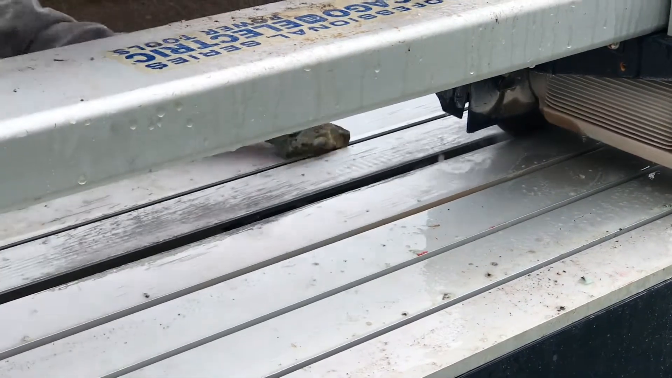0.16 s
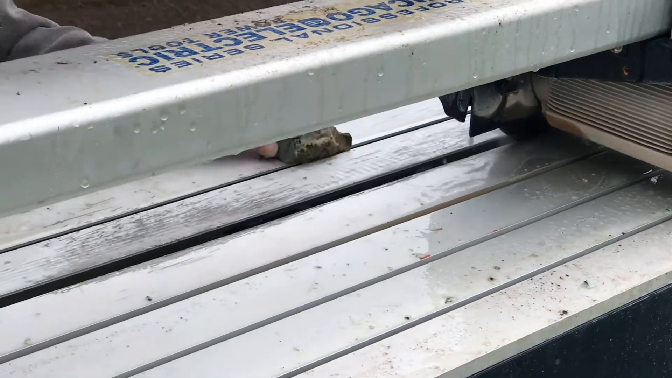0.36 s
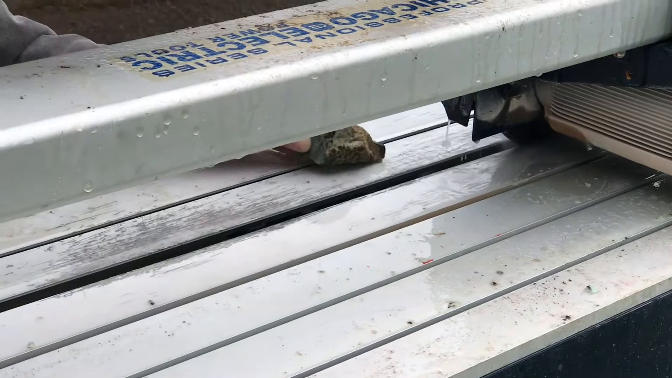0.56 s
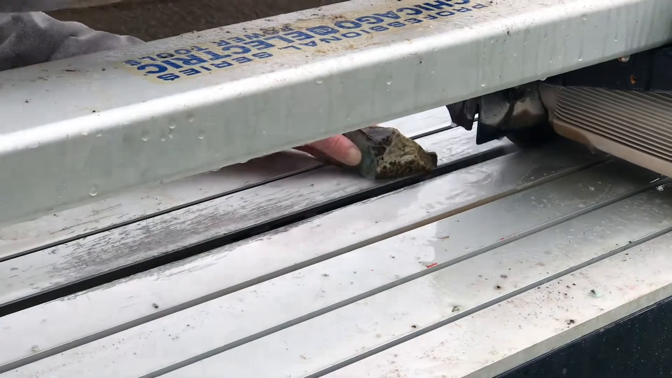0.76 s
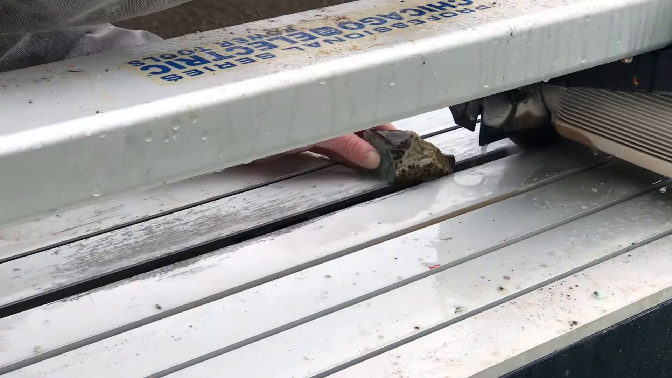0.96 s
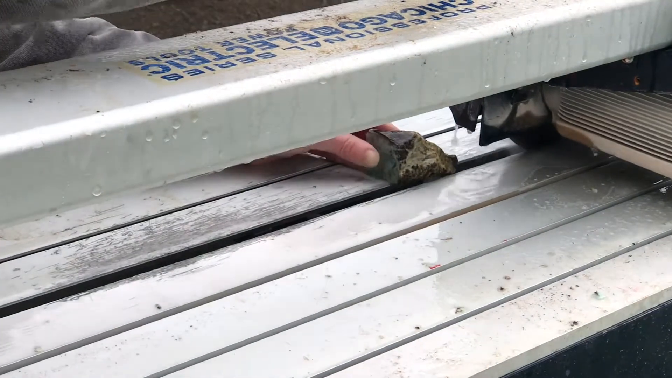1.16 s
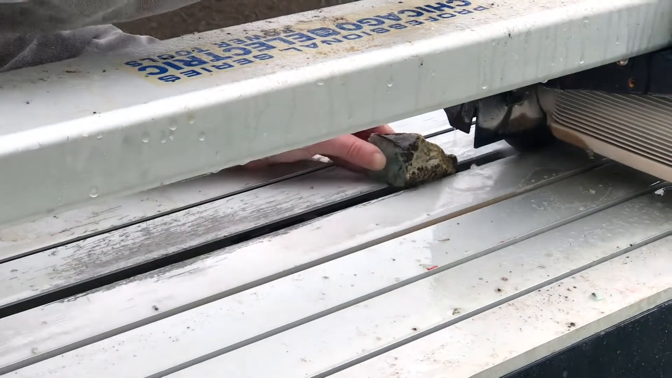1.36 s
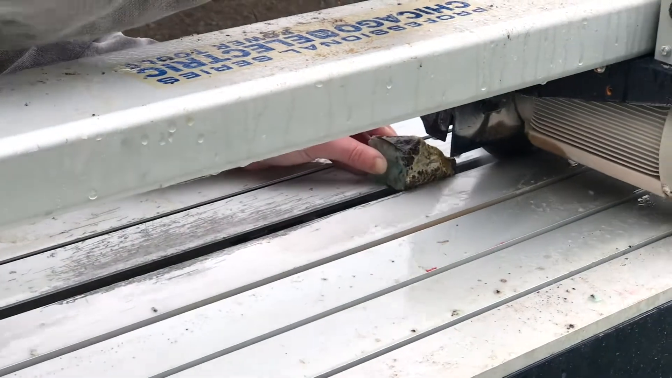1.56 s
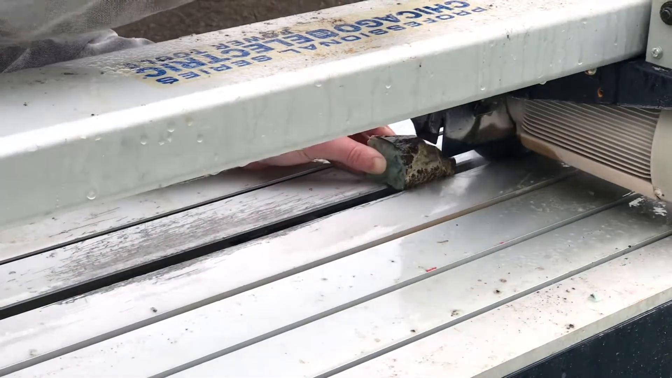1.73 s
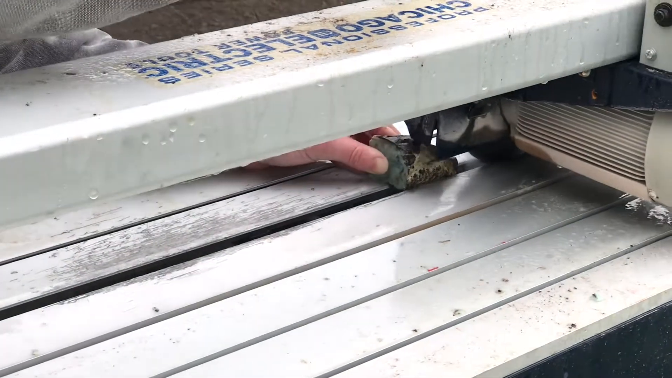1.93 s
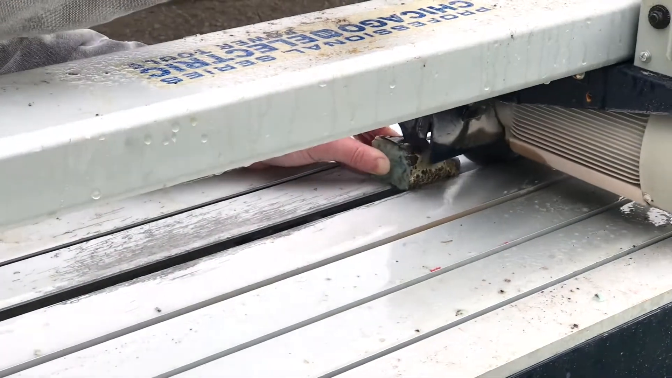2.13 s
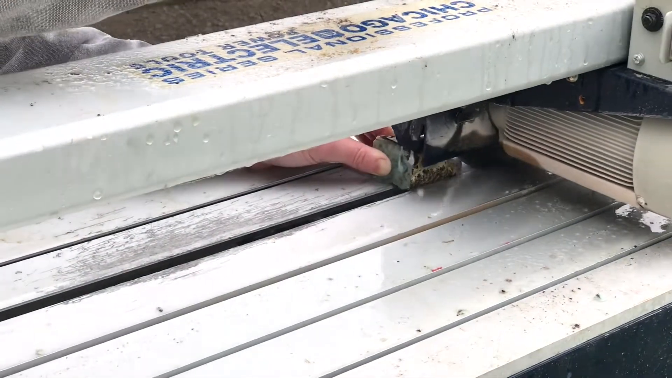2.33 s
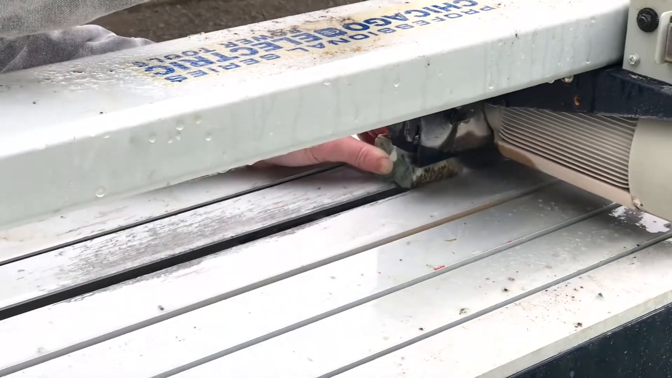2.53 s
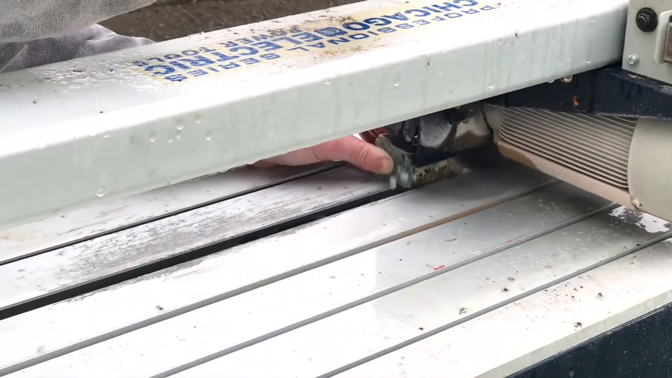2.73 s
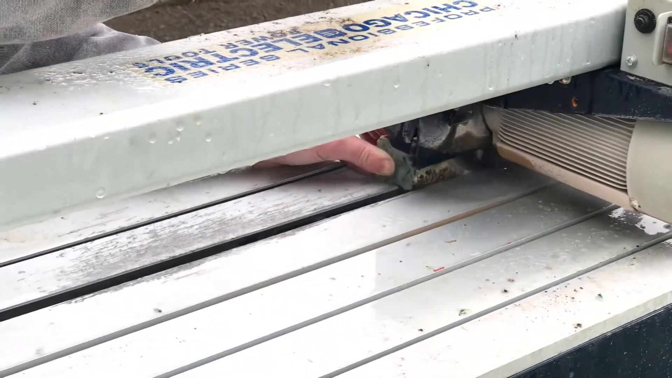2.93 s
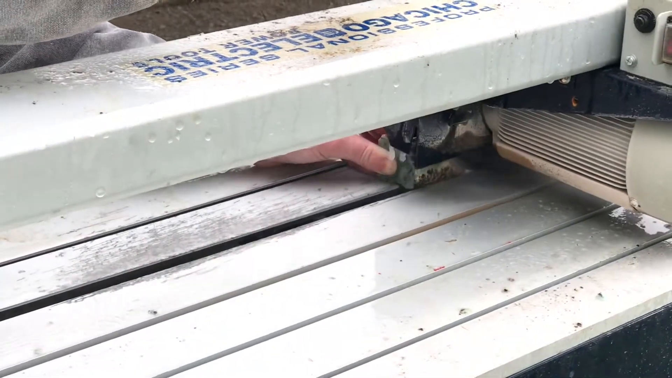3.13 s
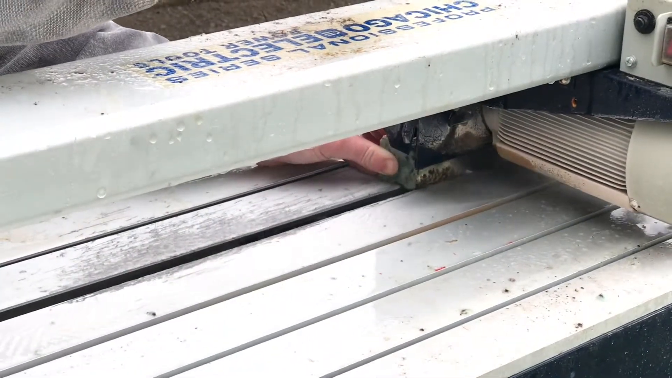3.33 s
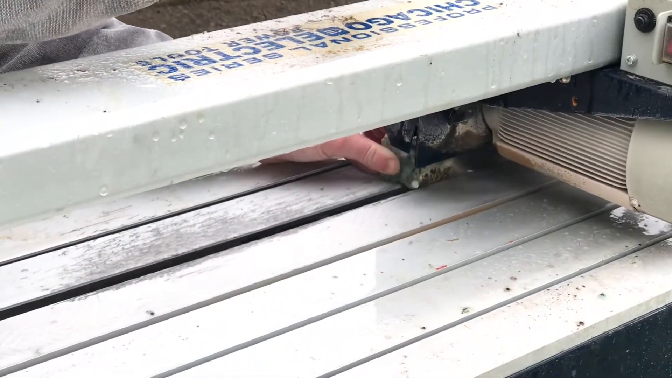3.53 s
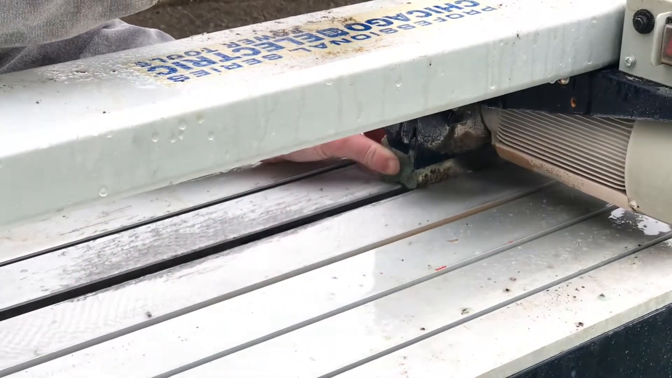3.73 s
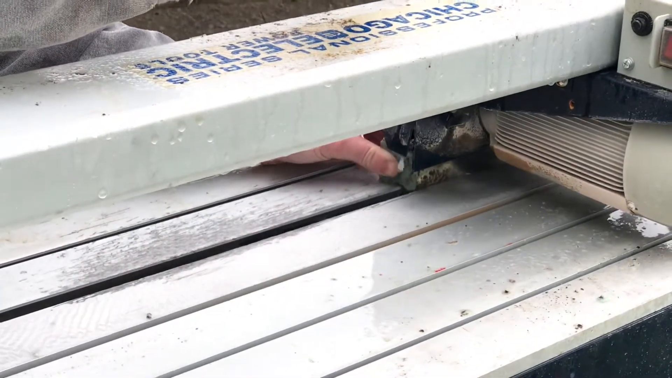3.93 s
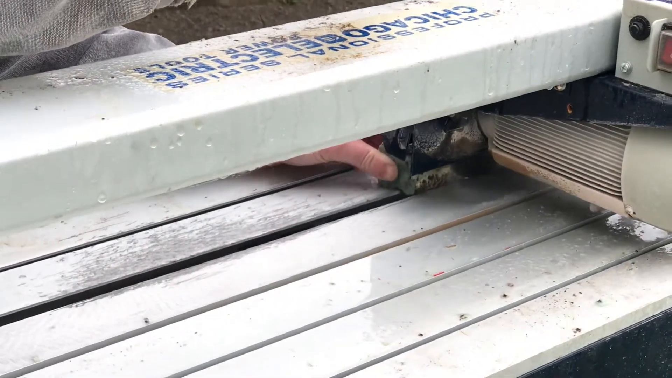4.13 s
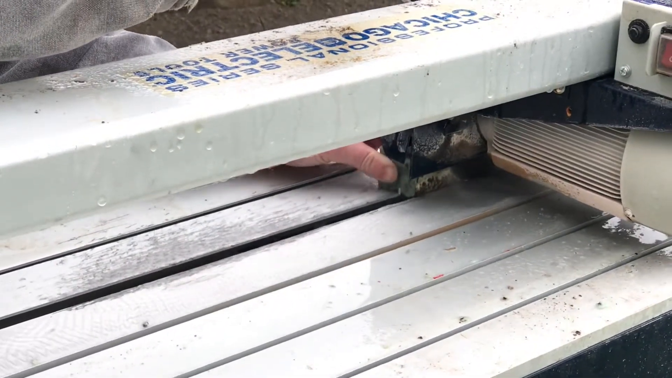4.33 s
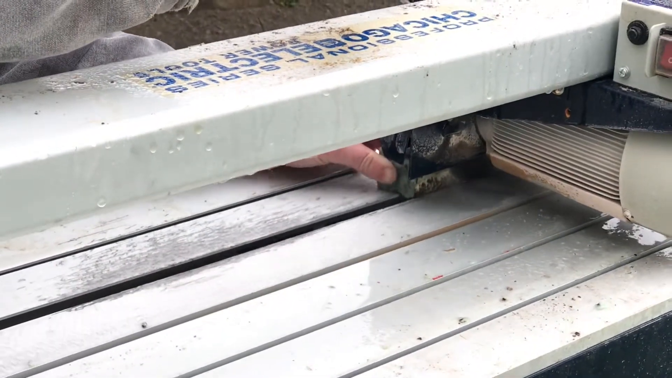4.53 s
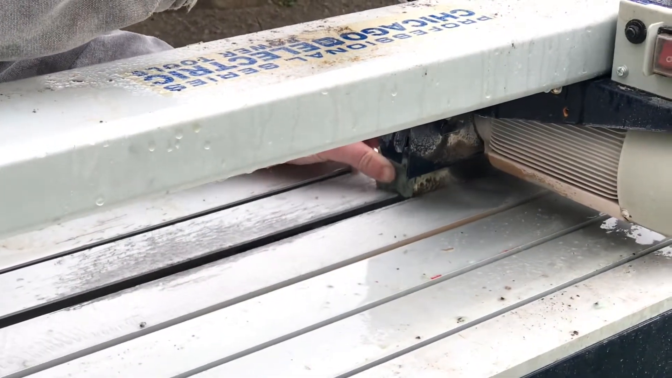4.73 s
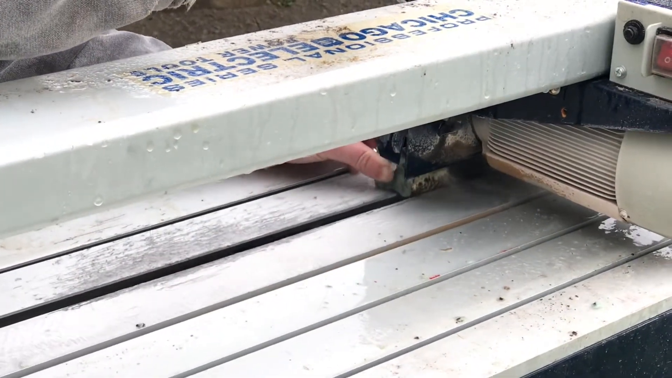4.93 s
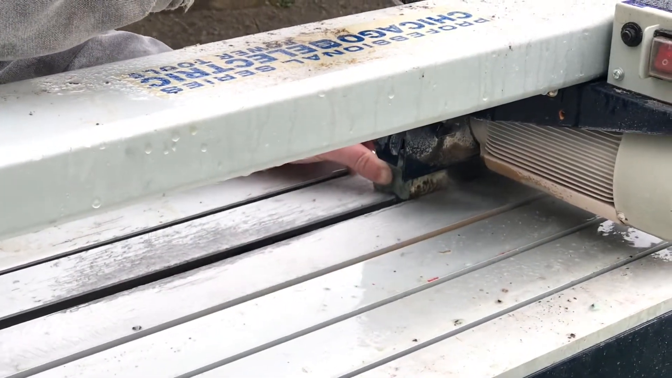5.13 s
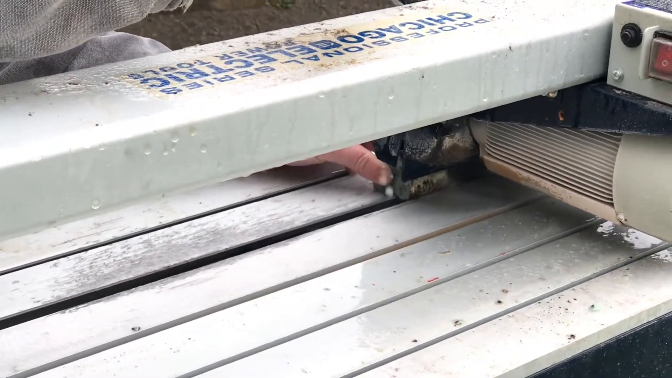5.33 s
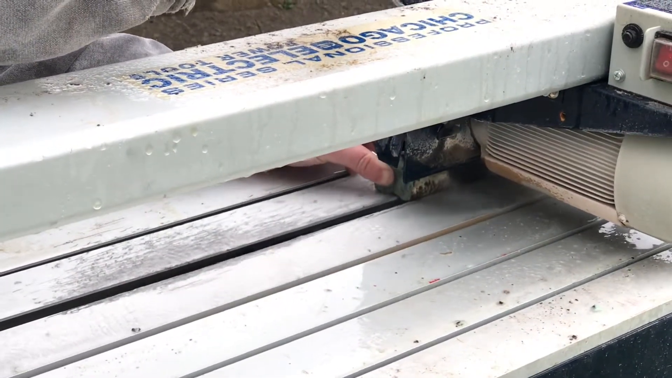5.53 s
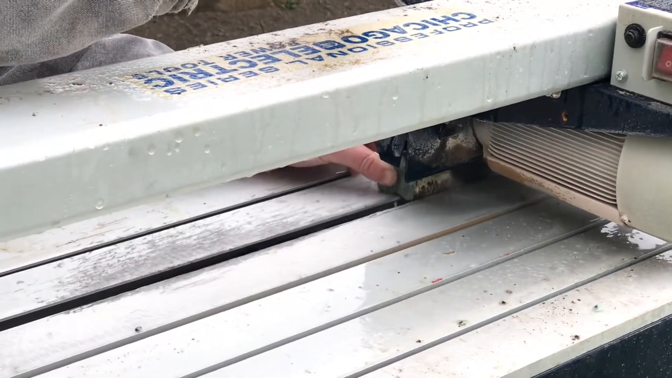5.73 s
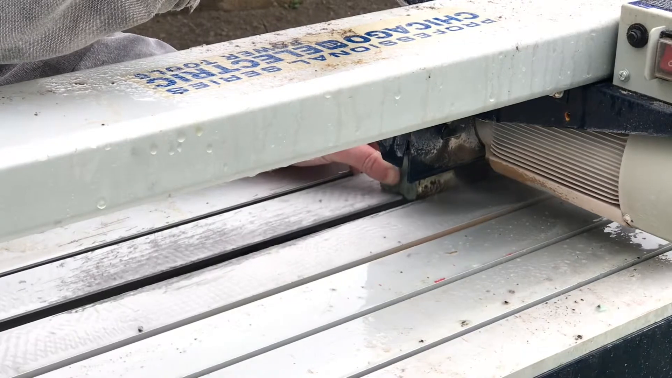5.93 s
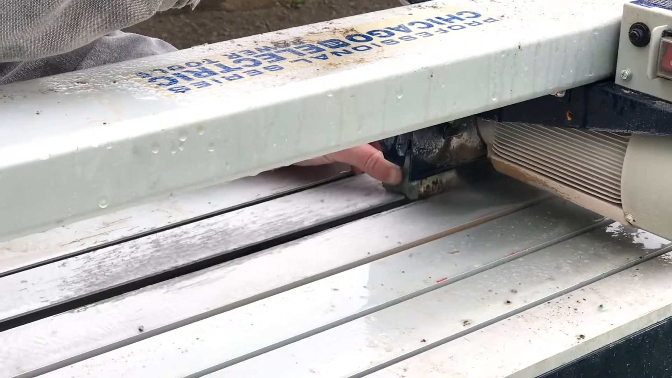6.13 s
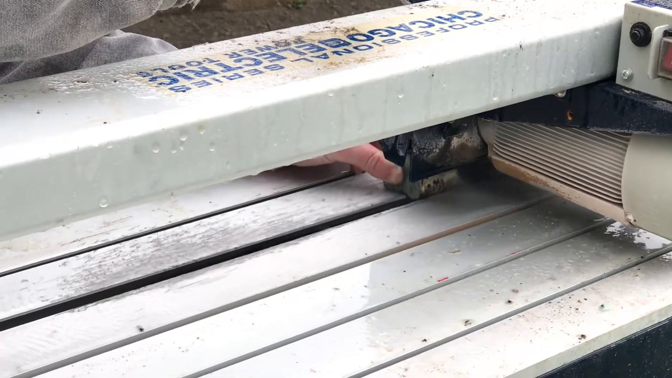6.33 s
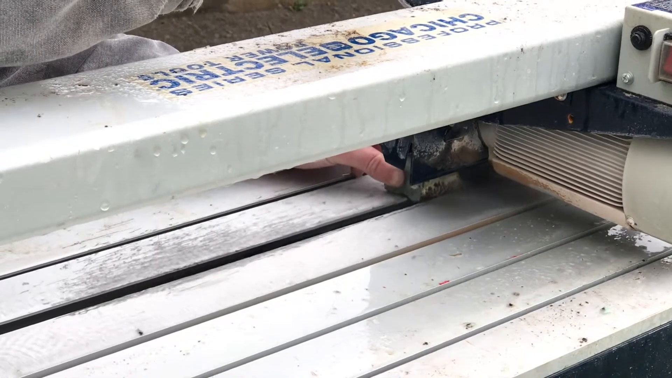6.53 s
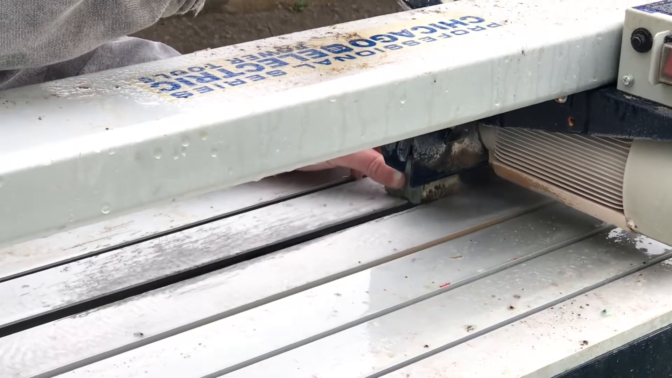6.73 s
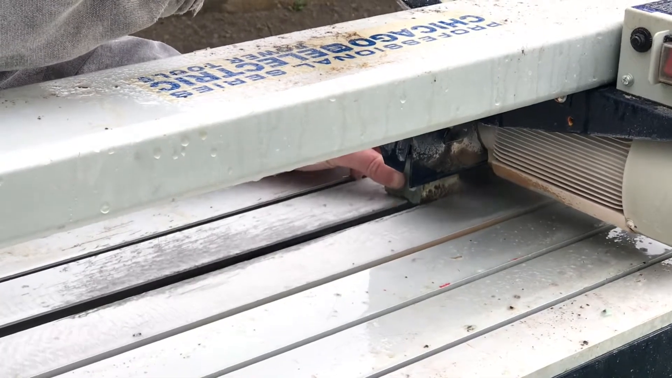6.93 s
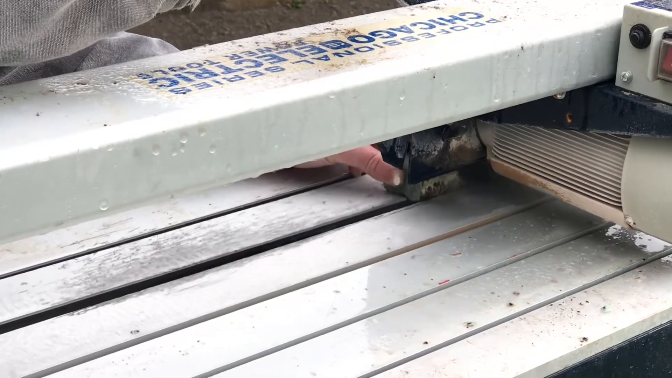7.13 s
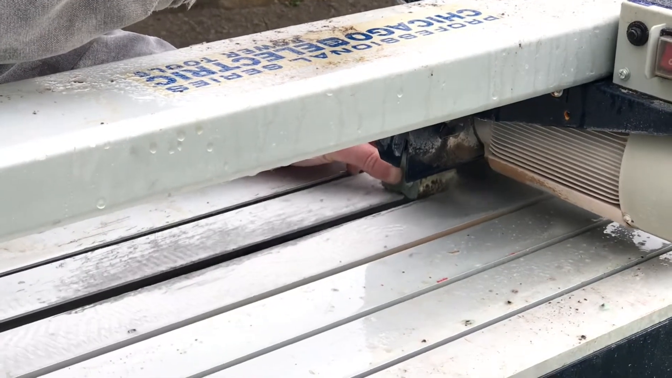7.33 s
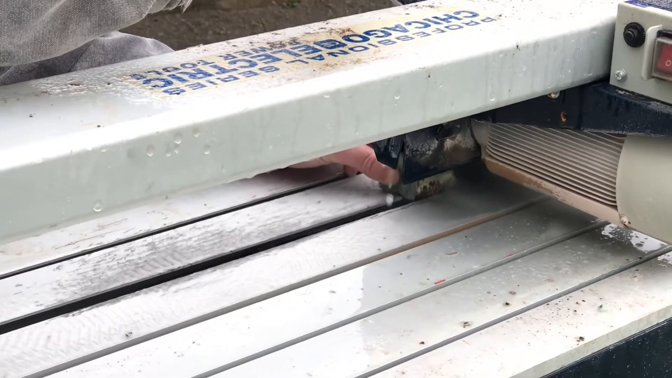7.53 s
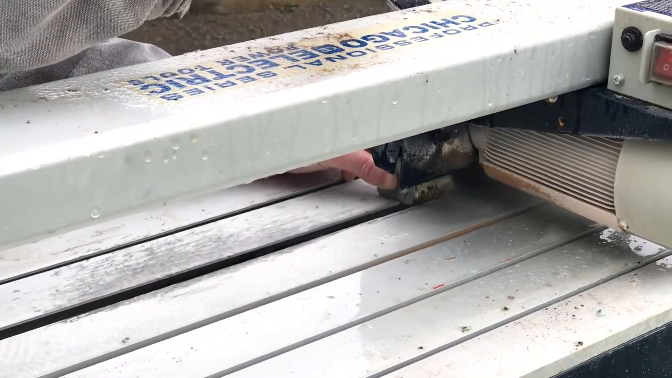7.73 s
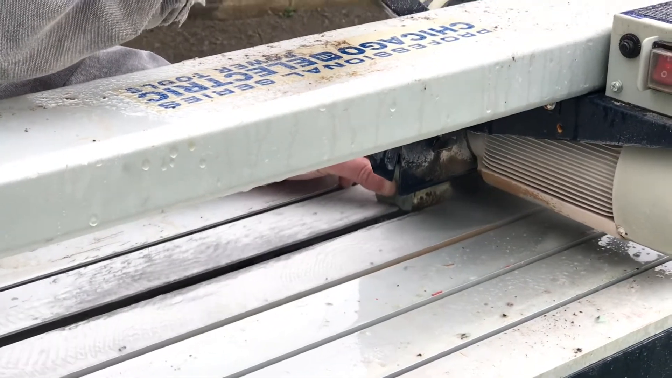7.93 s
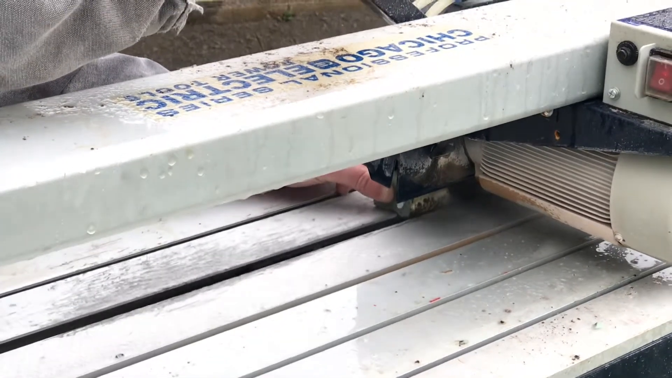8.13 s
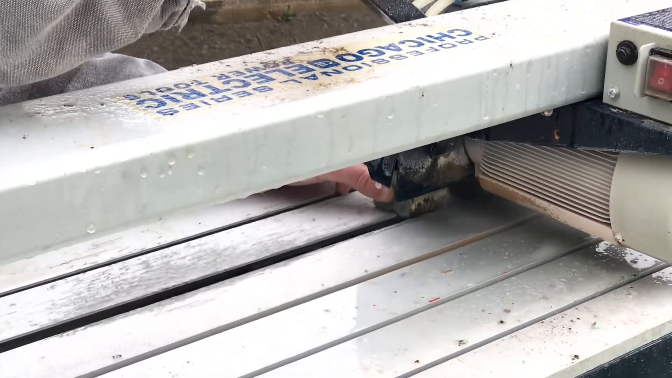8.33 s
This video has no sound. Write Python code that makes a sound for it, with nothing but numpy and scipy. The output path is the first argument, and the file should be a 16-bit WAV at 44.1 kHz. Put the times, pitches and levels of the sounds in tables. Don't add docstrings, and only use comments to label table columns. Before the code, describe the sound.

Close to a metal saw table outdoors, a motor idles with low throbbing hum and airy whirr. A stone is set down with a sharp ringing clack, then lighter knocks as it slides. Fine water spray hisses just before the blade bites with a bright burst. Loud buzzing, gritty grinding and metallic screech then hold to the end.

```python
import sys
import numpy as np
from scipy import signal
from scipy.fft import rfft, irfft, next_fast_len
from scipy.io import wavfile
from scipy.ndimage import uniform_filter1d, map_coordinates

SR = 44100
rng = np.random.default_rng(int(sys.argv[2]) if len(sys.argv) > 2 else 0)


def master_out(mix):
    frames = np.transpose(np.atleast_2d(mix))
    ceiling = np.clip(frames, -1, 1)
    pcm = np.round(ceiling * 32767).astype(np.int16)
    wavfile.write(sys.argv[1], SR, pcm)


def attenuation_scalar(level_db):
    decades = np.asarray(level_db, float) / 20
    return 10 ** decades


N = 369116
TIME = np.arange(N) / SR
BITE_S = 2.409

# time in seconds, speed in turns per second.
SHAFT = [(2.4, 59.7), (2.55, 58.85), (2.76, 59.28), (3.05, 58.6), (3.35, 58.6), (3.65, 58.15),
         (4.13, 58.35), (4.72, 58.0), (4.95, 57.55), (5.9, 56.95), (6.38, 56.7), (6.57, 55.35),
         (6.8, 56.38), (6.96, 55.7), (7.38, 54.98), (7.62, 54.1), (7.71, 56.5), (7.95, 58.12)]
# frequency in Hz, density in dB per Hz.
IDLE_SPECTRUM = [(47, -47), (80, -26), (122, -7), (152, -9), (190, -3), (270, -3.5), (302, -3), (586, -5),
                 (1300, -6.5), (1660, -3.5), (2310, -15), (3590, -15), (4790, -20.5), (5710, -26),
                 (15800, -20)]
# frequency in Hz, width in Hz, level in dB.
IDLE_BLADE_RINGS = [(3540, 500, -7), (5620, 450, 10), (8560, 360, 2), (11000, 400, 2)]
# frequency in Hz, level in dB.
IDLE_WHINES = [(895.5, -51), (480, -47.5), (597.5, -44), (942, -46.5), (1220, -54), (1530, -53),
               (1674, -51), (2045, -52.5)]
# time in seconds, level in dB.
THROBS = [(.03, -30), (.19, -29), (.44, -32), (.5, -41), (.61, -27), (.71, -28), (.8, -34), (.88, -29),
          (.98, -31), (1.12, -28), (1.24, -36), (1.31, -29.5), (1.46, -33), (1.55, -31), (1.69, -35),
          (1.76, -32), (1.85, -40), (1.96, -32), (2.05, -34), (2.15, -34), (2.25, -45), (2.34, -32.5)]
# time in seconds, level in dB.
SPRAY = [
    (1.6, -60),
    (1.98, -44),
    (2.08, -42),
    (2.4, -41.5),
]
# time in seconds, peak in dB, brightness in dB, t60 in seconds,
# dull thud in dB.
KNOCKS = [(0.22, 0, -11.5, 0.075, -6), (0.235, -2.5, -28, 0.057, -8), (0.338, -22, -7, 0.06, -9),
          (0.346, -23, -4, 0.05, -6), (0.352, -21, -3, 0.06, -5), (0.361, -24, -9, 0.046, -2),
          (0.403, -18.5, 0, 0.048, -10), (0.418, -12, -13, 0.077, -9), (0.548, -17.5, -16, 0.14, -8),
          (0.655, -4, -19, 0.055, -9.5), (0.824, -16.5, -28, 0.09, -4), (0.873, -28, -28, 0.3, 5),
          (1.038, -19, -21, 0.16, -6), (1.125, -19, -24, 0.11, 0)]
# frequency in Hz, level in dB, t60 in seconds.
TABLE_MODES = [(640, -23, 0.083), (1483, 4, 0.12), (1620, -1, 0.089), (1660, -14, 0.13), (1836, 6, 0.15),
               (1900, -26, 0.18), (2730, -27, 0.15), (3130, -17, 0.27)]
# time in seconds, pressure as loudness in dB, sideways blade flex in dB.
FEED = [(2.41, -23, -1), (2.44, -13, 0), (2.47, -7.5, -4.5), (2.585, -9.5, -3.5), (2.66, -15, -3),
        (2.87, -12.5, -1), (3.14, -16, -3), (3.34, -17, 2), (3.45, -17, -1.5), (4.98, -16, -7.5),
        (6.29, -16, -9), (6.49, -15, -7.5), (7.27, -17, -7), (7.41, -16.5, -4.5), (7.7, -15, -5.5),
        (7.99, -17.5, -8.5), (8.09, -16.5, -8.5), (8.37, -16, -12)]
# start in seconds, end in seconds, edge in seconds.
SKATE = (2.65, 2.89, .02)
# time in seconds, stage.
KERF = [
    (3.0, 0.0094),
    (3.2, 0.54),
    (4.3, 1.36),
    (4.6, 1.68),
    (6.35, 2.07),
    (6.55, 2.75),
    (7.65, 3.16),
    (7.85, 2.37),
]
# time in seconds, share from 0 to 1.
REPEATING = [(2.4, .45), (2.68, .82), (3.0, .75), (3.2, .94), (3.8, .94), (3.92, .75), (4.02, .95),
             (7.4, .95), (7.6, .87), (7.68, .62), (7.95, .94)]
# time in seconds, radians per multiple.
SPREAD = [
    (3.4, .7),
    (3.6, .45),
    (3.85, .6),
    (4.35, .6),
    (4.55, .3),
    (4.9, .3),
    (5.15, .7),
    (7.55, .7),
    (7.75, .3),
    (7.9, .75),
]
# multiple of shaft speed, level in dB.
ENTRY_ORDERS = [(1, -27), (2, -34), (3, -18), (4, -18.5), (5, -12), (6, -26), (7, -37), (8, -7.5),
                (9, -9.5), (10, -16), (11, -12), (12, -34), (13, -19.5), (14, -40), (15, -10.5), (16, -8.5),
                (17, -14.5), (18, -21), (19, -38), (20, -25), (21, -23), (22, 4), (23, -11), (24, 5),
                (25, -5), (26, -1), (27, -21), (28, -5), (29, -3), (30, -1.5), (31, -7), (32, -9),
                (33, -2.5), (34, -11), (35, -4.5), (36, -20), (37, -10), (38, -9.5), (39, -11), (40, -20)]
SHALLOW_ORDERS = [(1, -26), (2, -28), (3, -15), (4, -13.5), (5, -7.5), (6, -17), (7, -30), (8, -6.5),
                  (9, -3), (10, -12), (11, -14), (12, -12), (13, -19), (14, -28), (15, -4.5), (16, -35),
                  (17, -2), (18, -5), (19, -21), (20, -9), (21, -15.5), (22, -15.5), (23, -4), (24, 5.5),
                  (25, -4.5), (26, 7), (27, -11), (28, -20), (29, 6.5), (30, -10), (31, 1), (32, 2),
                  (33, -1), (34, -13), (35, 1), (36, -18), (37, -9), (38, -9), (39, -19), (40, -10)]
DEEP_ORDERS = [(1, -19), (2, -31), (3, -17), (4, -16.5), (5, -5), (6, -15.5), (7, -19), (8, -22.5),
               (9, -12), (10, -16), (11, -11.5), (12, -9), (13, -33), (14, -18.5), (15, -7), (16, -24),
               (17, -7), (18, -14.5), (19, -8), (20, -15), (21, -7), (22, 5.5), (23, -6.5), (24, -3.5),
               (25, -9), (26, -9), (27, 6.5), (28, -2.5), (29, -3), (30, -20), (31, -0.5), (32, 2),
               (33, -8.5), (34, -13.5), (35, -2.5), (36, -5), (37, -19), (38, -39), (39, -0.5), (40, -13.5)]
LOADED_ORDERS = [(1, -31), (2, -36), (3, -17), (4, -10.5), (5, -9), (6, -24.5), (7, -16), (8, -55),
                 (9, -20.5), (10, -16), (11, -7), (12, -14), (13, -16), (14, -41), (15, -9), (16, -11.5),
                 (17, -1.5), (18, -15), (19, -12), (20, -22), (21, -17), (22, -5), (23, -11.5), (24, -10.5),
                 (25, -14), (26, 2.5), (27, -4.5), (28, -6), (29, -2), (30, -1), (31, -4), (32, 0.5),
                 (33, -4), (34, -11.5), (35, -25), (36, -1), (37, -24), (38, -19), (39, -6), (40, -25)]
# time in seconds, half length in
# seconds, multiple, half width in multiples, level in dB.
LOW_SWELLS = [(4.64, 0.16, 25.7, 1.4, 6.5), (4.82, 0.15, 32.5, 2.0, 6), (6.94, 0.41, 27, 4.5, 2.5),
              (2.85, 0.07, 8, 1.5, -7), (3.2, 0.27, 13, .5, 11), (7.5, 0.21, 5, 0.4, -14),
              (8.15, .3, 7, 0.88, -22), (2.54, .1, 11.5, 1.3, -10), (2.55, .22, 15, .5, -12),
              (2.498, 0.048, 16, 0.5, 8), (2.97, 0.13, 26, 0.5, -6), (3.222, 0.068, 24, 0.9, -18),
           (3.22, 0.24, 38, 2, 11.5), (3.28, 0.56, 27, 0.62, 13), (3.33, 0.13, 32, 1.8, -16),
           (3.6, 0.45, 9, 0.5, -10.0), (3.74, 0.18, 32, 0.5, -9), (4.05, 0.3, 26, 0.56, -15),
           (3.85, 0.84, 28, 0.42, 13.0), (4.25, 1.7, 34, 0.54, 11), (4.356, 0.18, 22, 0.76, 10),
           (4.36, 0.77, 29, 0.5, -19), (4.667, 0.091, 23, 2.8, -11), (4.67, 0.2, 25, 0.42, 14),
           (4.72, 0.29, 31, 0.45, -20), (4.5, 0.7, 30, 0.46, 17.5), (4.77, 0.14, 18, 0.74, -12),
           (5.25, 0.22, 26, 0.5, 5), (5.45, 0.33, 23, 0.55, 8.5), (5.71, 0.7, 9, 0.5, -12),
           (5.76, 1.04, 22, 0.46, -5.5), (5.985, 0.27, 36, 0.5, 7), (2.85, 0.18, 11, 0.5, 7.5),
           (6.03, 0.83, 29, 1.1, 5.5), (6.08, 0.34, 32, 0.61, -12), (6.5, 0.8, 26, 0.43, 6.5),
           (6.67, 0.36, 34, 1.3, 8), (7.31, 0.33, 25, 0.5, 7), (7.416, 0.28, 26, 0.5, -14),
           (7.59, 0.79, 31, 0.45, -15), (7.64, 0.37, 17, 0.55, -12), (7.748, 0.15, 29, 0.41, 9),
           (8.01, 0.16, 34, 1, 15), (8.01, 0.39, 27, 0.45, -7), (8.11, 0.24, 19, 0.5, -15),
           (8.16, 0.18, 29, 0.5, -21), (8.27, 0.7, 24, 0.45, 9), (8.27, 0.7, 28, 0.46, 7.5),
           (8.27, 0.47, 30, 0.5, 17)]
# time in seconds, half length in
# seconds, multiple, half width in multiples, level in dB.
HIGH_SWELLS = [(2.5, 0.4, 87.6, 1.0, -16), (2.8, 1, 99, 0.49, -10.9), (2.46, 0.64, 46, 4.2, -11),
               (2.6, 1.1, 103, 2.3, 12), (6.3, 1.4, 127, 7.7, -6.5), (2.76, 0.46, 71, 5.3, -10.5),
               (3.03, 0.13, 87, 0.83, 12), (3.38, 0.91, 90, 1.62, -11), (6.23, 0.45, 90.4, 0.77, 9),
               (3.79, 0.084, 95, 0.6, 10), (4.0, 0.98, 79, 0.84, -9), (2.9, 1.3, 266, 5, -7),
               (4.25, 0.65, 57, 1.5, -18), (4.1, 1.2, 100, 1.5, -9.5), (4.85, 0.25, 85, 0.7, 8),
               (2.8, 1.2, 118, 8, 4), (5.36, 1.1, 55.6, 1.0, 8), (3.0, 1.2, 240, 4.2, -6),
               (3.3, 0.8, 252, 4.4, 6), (5.85, 0.28, 97, 0.6, 13.5), (5.3, 1.2, 49, 0.9, -12),
               (2.8, 1.3, 167, 4.7, -6), (4.26, 1.2, 142, 5.1, 6.5), (5.92, 0.72, 85, 1.5, -12),
               (6.2, 1.7, 103, 1.1, -10), (4.2, 0.55, 45.5, 1.5, -7), (7.7, 1.6, 205, 8, 5),
               (6.5, 0.5, 96, 0.9, -12.0), (5.6, 1.5, 262, 5, 6), (3.04, 1.3, 212, 4.9, -8),
               (6.9, 0.56, 100, 0.98, 13), (3.4, 0.28, 85, 0.6, -11), (3.8, 0.42, 96.5, 0.9, -11.5),
               (7.7, 0.23, 81, 3.0, 7), (7.42, 0.19, 96, 0.53, 15.5), (7.5, 0.25, 102, 1.3, 3),
               (7.44, 0.36, 91, 6, -8.5), (7.96, 0.23, 84, 1.2, -12.9), (8.2, 0.3, 97, 0.5, 18),
               (8.2, 0.22, 94.6, 0.8, 15), (2.5, 0.18, 84.5, 1.1, 8.5), (4.5, 0.8, 204, 4.3, 5)]
# frequency in Hz, density in dB per Hz.
GRIND_SPECTRUM = [(100, -34), (160, -22), (760, -10.5), (850, -13), (1500, 13.5), (2100, 11.5),
                  (2650, -4.5), (4600, -2), (6400, -3), (10000, -1.5), (15700, 2)]
# frequency in Hz, width in Hz, level in dB.
BLADE_MODES = [(3070, 250, -8), (3770, 83, -11), (4390, 67, -12), (5110, 120, -3), (5640, 250, 0),
               (6780, 100, -10), (7210, 110, -12), (7590, 130, -11), (8060, 150, -7), (8650, 140, -9),
               (9120, 100, -10), (10100, 96, -12), (10600, 130, -11), (11500, 100, -6), (12300, 130, -8),
               (13100, 61, -8), (13700, 110, -7), (14200, 140, -8), (15600, 240, -7)]
# frequency in Hz, width in Hz, level in dB.
MORE_BLADE_MODES = [(3274, 600, -11), (5155, 21, -0.5), (5586, 24, 6)]
# frequency in Hz, width in Hz, level in dB.
STONE_MODES = [(944, 42, -3), (1290, 29, -8.5), (1428, 30, -8), (1710, 33, -8.5), (2034, 58, -14.5),
               (2310, 42, -11), (3060, 59, 3), (3325, 95, 1.5), (3700, 90, -4), (4255, 140, -5.5)]
# share of pressure, share of flex, level in dB entering, shallow, deep,
# pushed hard.
RADIATION = [
    (1.0, 0.12, -33.5, -33.5, -31.5, -34),
    (1.0, 0.0, -31, -31, -31.5, -30.5),
    (1.0, 0.27, -26, -25, -22.5, -23),
    (1.0, 0.35, -27.5, -30.5, -26, -27.5),
    (1.0, 0.99, -30.5, -31, -25, -25.5),
    (1.0, 0.99, -21, -20.5, -23, -25.5),
    (1.0, 0.1, -18, -17, -17, -16.5),
]
# extra level in dB, fade in seconds.
BITE_BURST = [
    (0, 0.062),
    (-16, 0.078),
    (3, .03),
    (5, 0.16),
    (1, 0.033),
    (2, .03),
    (12, 0.047),
]
# time in seconds, half length in seconds, depth in dB,
# loudest turn fraction.
WOBBLES = [(3.5, 0.31, 2, 0.56), (4.4, 0.1, 2.5, 0.8), (5.5, 0.22, 3, 0.092), (6.82, 0.12, 3.5, 0.68),
           (8.098, .3, 3, 0.63)]
# time in seconds, low edge in Hz, high edge in Hz, level in dB.
SLIPS = [(3.09, 14400, 15600, -7), (4.04, 6600, 10100, -5), (4.5, 14600, 15800, -1),
         (4.945, 11200, 13100, -3), (7.565, 8300, 11000, -3)]

USUAL_FEED_DB, USUAL_FLEX_DB = -16, -7
SKATE_DB = -7
SHAKE_START_DB, SHAKE_BITE_DB, SHAKE_CUT_DB, SHAKE_SINK_S = -53, -46, -57.5, 0.27
HUM_START_DB, HUM_BITE_DB, HUM_CUT_DB, HUM_SINK_S = -55, -38, -68, 0.05
SHAKE_LOADED_DB = -3.5
AIR_START_DB, AIR_BITE_DB, AIR_CUT_DB = -33.5, -35, -42
THROB_HALF_S, THROB_HZ = 0.033, 194.0
SLANT_RAD = 0.25
GRAZE_DB, GRAZE_S = -6, 0.017
LOW_ORDERS, HIGH_ORDERS, RIM_STEPS = 41, 300, 2048
SLIP_HALF_S = 0.023


def rms_one(x):
    return x / np.sqrt(np.mean(x ** 2) + 1e-20)


def in_time(rows):
    s, *columns = np.transpose(rows)
    return [np.interp(TIME, s, c) for c in columns]


def drift(rate, shape=(N,)):
    r = np.exp(-2 * np.pi * rate)
    run_in = int(3 / rate)
    white = rng.standard_normal(shape[:-1] + (shape[-1] + run_in,))
    return rms_one(signal.lfilter([1], [1, -2 * r, r * r], white)[..., run_in:])


def colour(x, spectrum, peaks=(), lift_db=0):
    size = next_fast_len(N + SR // 4)
    hz = np.maximum(np.arange(size // 2 + 1) * SR / size, 1)
    corner_hz, corner_db = np.transpose(spectrum)
    gain = attenuation_scalar(np.interp(np.log(hz), np.log(corner_hz), corner_db))
    rings = sum(attenuation_scalar(db + lift_db) / (1 + 1j * (hz ** 2 - f ** 2) / (hz * width))
                for f, width, db in peaks)
    return irfft(rfft(x, size) * gain * (1 + rings), size)[:N]


def band(x, low_hz, high_hz):
    sos = signal.butter(4, [low_hz, high_hz], "band", fs=SR, output="sos")
    return signal.sosfilt(sos, x)


def skating():
    start, end, edge = SKATE
    return np.clip(np.minimum(TIME - start, end - TIME) / edge, 0, 1)


def motor(turns):
    near = np.minimum(TIME / BITE_S, 1)
    since_s = np.maximum(TIME - BITE_S - 0.07, 0)
    idling = TIME < BITE_S
    skate_db = SKATE_DB * skating()

    def rise_and_sink(start_db, bite_db, cut_db, sink_s):
        rise_db = start_db + (bite_db - start_db) * near
        return cut_db + (rise_db - cut_db) * np.exp(-since_s / sink_s)

    unsteady = np.minimum(since_s / 0.33, 1) * drift(4 / SR)
    shake_db = rise_and_sink(SHAKE_START_DB, SHAKE_BITE_DB, SHAKE_CUT_DB, SHAKE_SINK_S) + 1.5 * unsteady
    shake_db = shake_db + SHAKE_LOADED_DB * np.clip(in_time(KERF)[0] - 2, 0, 1)
    shake = attenuation_scalar(shake_db + 4.5 + 0.5 * drift(6 / SR)) * np.sin(2 * np.pi * turns)

    hum_db = rise_and_sink(HUM_START_DB, HUM_BITE_DB, HUM_CUT_DB, HUM_SINK_S) + 3.7 * unsteady + skate_db
    hum = attenuation_scalar(hum_db - 0.5 + 1.0 * drift(6 / SR)) * np.sin(4 * np.pi * turns)

    jolts = sum(attenuation_scalar(db) * np.exp(-((TIME - s) / THROB_HALF_S) ** 2) for s, db in THROBS)
    swell = np.where(idling, jolts, attenuation_scalar(-48.5 + skate_db + 4.6 * drift(8 / SR)))
    throb = attenuation_scalar(-1.5) * swell * np.sin(2 * np.pi * THROB_HZ * TIME + 0.5 * drift(10 / SR))

    idle_db = np.where(idling, AIR_START_DB + (AIR_BITE_DB - AIR_START_DB) * near, AIR_CUT_DB + skate_db)
    gusts = rng.standard_normal(N) * attenuation_scalar(1.1 * drift(12 / SR))
    air = rms_one(colour(gusts, IDLE_SPECTRUM, IDLE_BLADE_RINGS))
    whine = sum(attenuation_scalar(db + 2.2 * drift(4 / SR)) * np.sin(2 * np.pi * (hz * TIME + rng.random()))
                for hz, db in IDLE_WHINES)
    return shake + hum + throb + attenuation_scalar(idle_db + 2.5) * air + attenuation_scalar(idle_db + 33.5) * whine


def spray():
    hiss = rms_one(band(rng.standard_normal(N), 3300, 13300))
    return attenuation_scalar(in_time(SPRAY)[0]) * hiss * (TIME < BITE_S)


def knocks():
    out = np.zeros(N)
    chance = rng.standard_normal((len(KNOCKS), len(TABLE_MODES)))
    t = TIME[:SR // 4]
    for (s, peak_db, bright_db, t60_s, thud_db), luck in zip(KNOCKS, chance):
        ring = sum(attenuation_scalar(db + 3.7 * c - 60 * t / min(t60_s, mode_t60_s)) * np.sin(2 * np.pi * hz * t)
                   for (hz, db, mode_t60_s), c in zip(TABLE_MODES, luck))
        thud = band(rng.standard_normal(len(t)), 300, 2130) * attenuation_scalar(-60 * t / t60_s)
        thump = np.sin(2 * np.pi * 270 * t) * attenuation_scalar(-60 * t / (1.2 * t60_s))
        dull = thud / np.abs(thud).max() + 0.1 * thump
        crack = band(rng.standard_normal(len(t)), 2600, 4500)
        crack = crack + 0.27 * band(rng.standard_normal(len(t)), 4200, 10000)
        crack = crack * attenuation_scalar(bright_db + 7 - 60 * t / (0.57 * t60_s))
        hit = 0.63 * ring / np.abs(ring).max() + attenuation_scalar(thud_db) * dull + crack
        start = round(s * SR)
        out[start:start + len(t)] += attenuation_scalar(peak_db) * hit * np.clip(t / 0.00091, 0, 1)
    return out


def crushing(turns):
    run_out = attenuation_scalar(0.5 * np.cos(2 * np.pi * turns) + 2.0 * drift(25 / SR))
    grains = rng.standard_normal(N) * attenuation_scalar(2.0 * drift(900 / SR)) * run_out
    return colour(grains, GRIND_SPECTRUM, BLADE_MODES + MORE_BLADE_MODES[1:] + STONE_MODES, lift_db=20)


def rim(turns, order_db, spread, wander_db, wander_rate, slant=0):
    orders, count = order_db.shape
    step = spread * (drift(0.003, (orders, count)) + rng.standard_normal((orders, 1)))
    phase = np.cumsum(step + slant * np.arange(orders)[:, None], axis=0)
    size = attenuation_scalar(order_db + wander_db * np.minimum(drift(wander_rate, (orders, count)), 1.3))
    pattern = irfft((size * np.exp(1j * phase)).T, RIM_STEPS)
    pattern = np.hstack([pattern, pattern[:, :1]])
    return rms_one(map_coordinates(pattern, [turns, turns % 1 * RIM_STEPS], order=1))


def per_turn(turns, curve):
    return np.interp(np.arange(int(turns[-1]) + 2), turns, curve)


def groups(rows, size, when_s):
    multiples = np.arange(size)[:, None]
    return sum(db * np.exp(-((multiples - k) / half) ** 2) * np.exp(-((when_s - s) / half_s) ** 2)
               for s, half_s, k, half, db in rows)


def low_grit(turns):
    stages = np.array([ENTRY_ORDERS, SHALLOW_ORDERS, DEEP_ORDERS, LOADED_ORDERS])[:, :, 1].T
    stages = np.vstack([stages[:1], stages])
    kerf = per_turn(turns, in_time(KERF)[0])
    order_db = np.array([np.interp(kerf, np.arange(4), db) for db in stages])
    order_db = order_db + groups(LOW_SWELLS, LOW_ORDERS, per_turn(turns, TIME))
    spread = per_turn(turns, in_time(SPREAD)[0])
    return rim(turns, order_db, spread, 2.0, 0.015, SLANT_RAD)


def high_grit(turns):
    orders = np.arange(HIGH_ORDERS)
    when_s = per_turn(turns, TIME)
    patches = uniform_filter1d(drift(0.025, (HIGH_ORDERS, len(when_s))), size=7, axis=0)
    patches_db = np.interp(orders, [105, 115], [0.3, 1.7])[:, None] * rms_one(patches)
    order_db = patches_db + np.minimum(groups(HIGH_SWELLS, HIGH_ORDERS, when_s), 14)
    spread = np.interp(orders, [105, 115], [2.3, 1.5])[:, None]
    wander_db = np.interp(orders, [80, 84, 105, 115], [5.2, 3.6, 3.6, 4.6])[:, None]
    pattern = rim(turns, order_db, spread, wander_db, 0.042)
    return colour(pattern, GRIND_SPECTRUM, BLADE_MODES + MORE_BLADE_MODES, lift_db=15)


def radiated_db(turns):
    kerf = in_time(KERF)[0]
    feed_db, flex_db = in_time(FEED)
    since_bite_s = np.abs(TIME - BITE_S)
    wobble_db = sum(db * np.exp(-((TIME - s) / half_s) ** 2) * np.cos(2 * np.pi * (turns - at))
                    for s, half_s, db, at in WOBBLES)
    levels_db = []
    for i, ((push, bend, *stage_db), (extra_db, fade_s)) in enumerate(zip(RADIATION, BITE_BURST)):
        db = push * (feed_db - USUAL_FEED_DB) + bend * (flex_db - USUAL_FLEX_DB)
        db = db + np.interp(kerf, np.arange(4), stage_db)
        db = db + extra_db * np.exp(-since_bite_s / fade_s)
        if i < 2:
            db = db + SKATE_DB * skating()
        if i in (4, 5):
            db = db + wobble_db
        levels_db.append(db)
    return levels_db


def grind(turns):
    share = in_time(REPEATING)[0]
    crush, low, high = crushing(turns), low_grit(turns), high_grit(turns)
    ranges = [(160, 800, low, 1), (800, 1180, low, 1), (1180, 2400, low, 1), (2450, 4600, high, 0.92),
              (4800, 5330, high, 0.98), (5330, 5860, high, 0.96), (5950, 19000, high, 0.76)]
    out = 0
    for (low_hz, high_hz, pattern, repeat), db in zip(ranges, radiated_db(turns)):
        steady = rms_one(band(pattern, low_hz, high_hz))
        fresh = rms_one(band(crush, low_hz, high_hz))
        out = out + attenuation_scalar(db) * (np.sqrt(share * repeat) * steady + np.sqrt(1 - share * repeat) * fresh)
    since_touch = (turns - np.interp(BITE_S, TIME, turns)) % 1
    out = out * attenuation_scalar(GRAZE_DB * since_touch * np.exp(-np.abs(TIME - BITE_S) / GRAZE_S))
    return out * np.clip((TIME - BITE_S) / 0.0065, 0, 1)


def scene():
    turns = np.cumsum(in_time(SHAFT)[0]) / SR
    mono = motor(turns) + spray() + knocks() + grind(turns)
    return np.tile(mono, (2, 1))


def roll_off(x):
    return signal.sosfilt(signal.butter(12, 16660, fs=SR, output="sos"), x)


def record(dry):
    rounded = 0.75 * np.tanh(dry / 0.75)
    low_pass = signal.ellip(12, 0.5, 65, 15740, fs=SR, output="sos")
    cut = signal.sosfilt(low_pass, rounded)
    side = 0
    for s, low_hz, high_hz, db in SLIPS:
        window = np.cos(np.pi / 2 * np.clip((TIME - s) / SLIP_HALF_S, -1, 1))
        side = side + attenuation_scalar(db) * band(cut[0] * window, low_hz, high_hz)
    return roll_off(cut + side * [[1], [-1]])


dry = scene()
out = record(dry)
master_out(out)
```